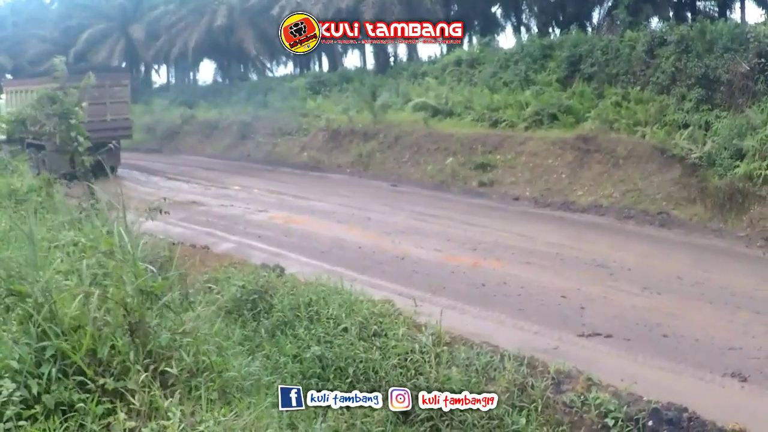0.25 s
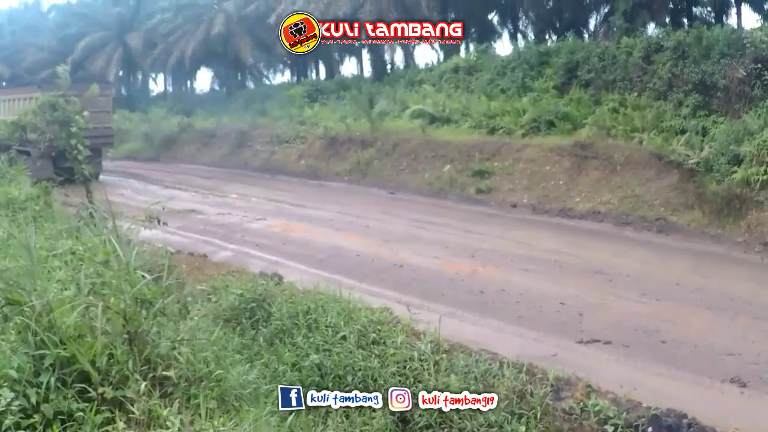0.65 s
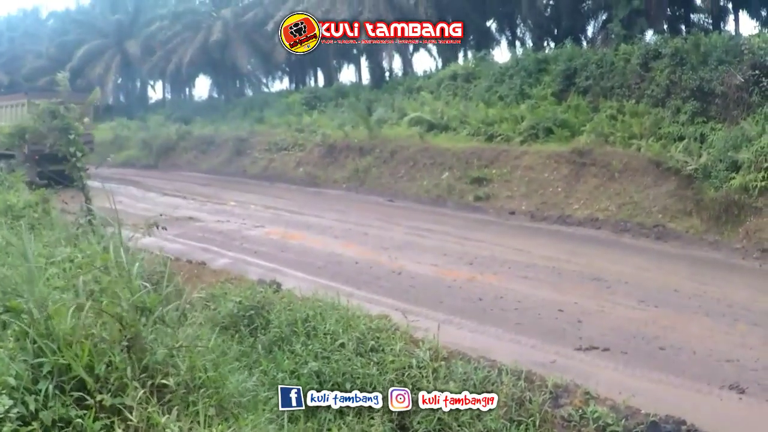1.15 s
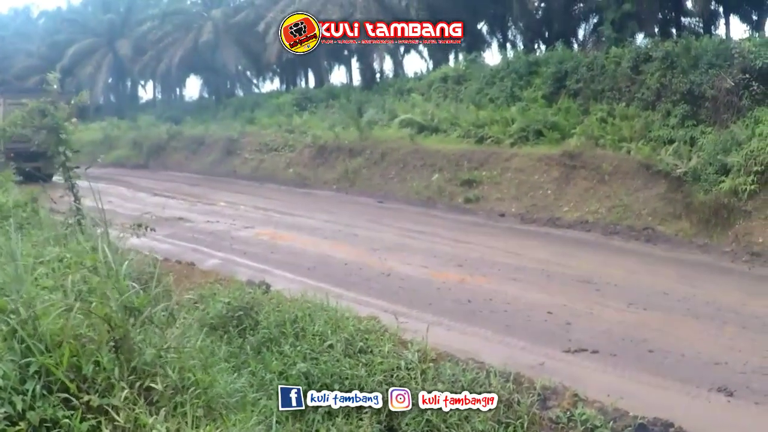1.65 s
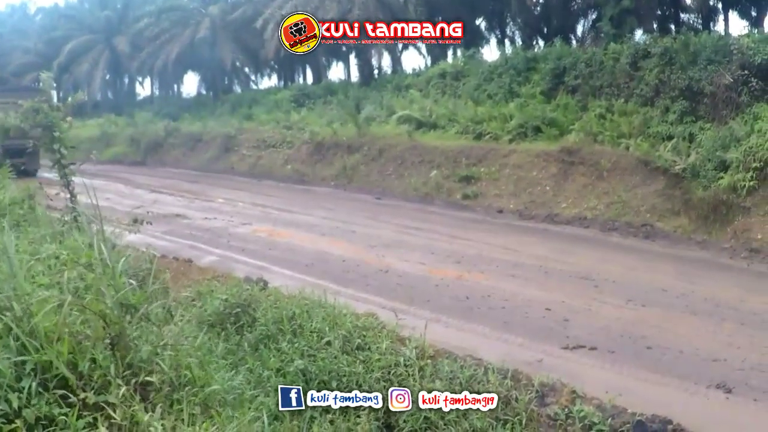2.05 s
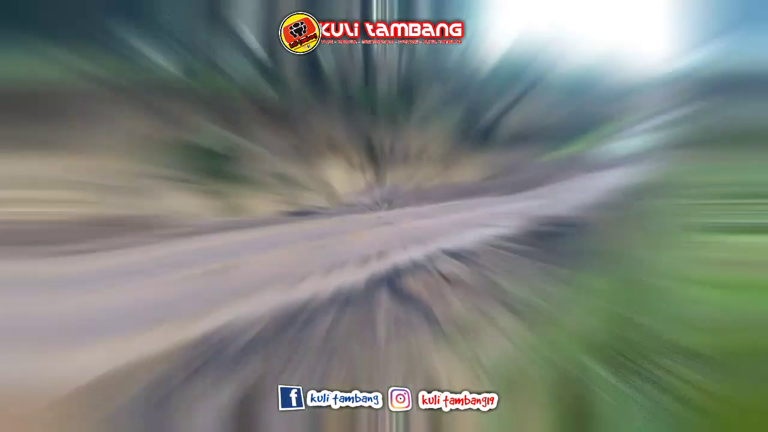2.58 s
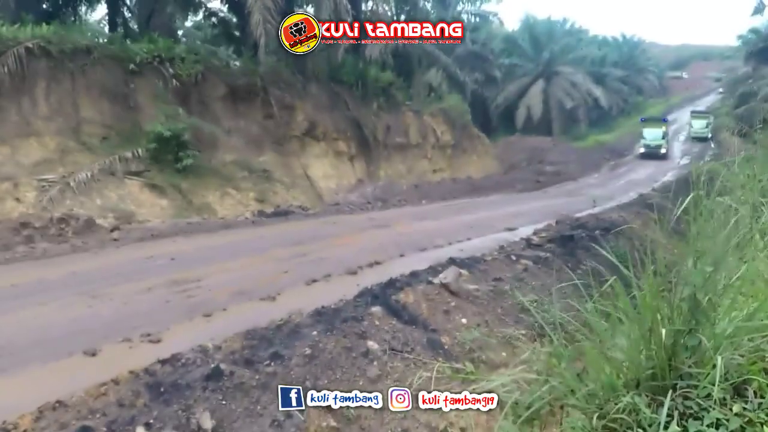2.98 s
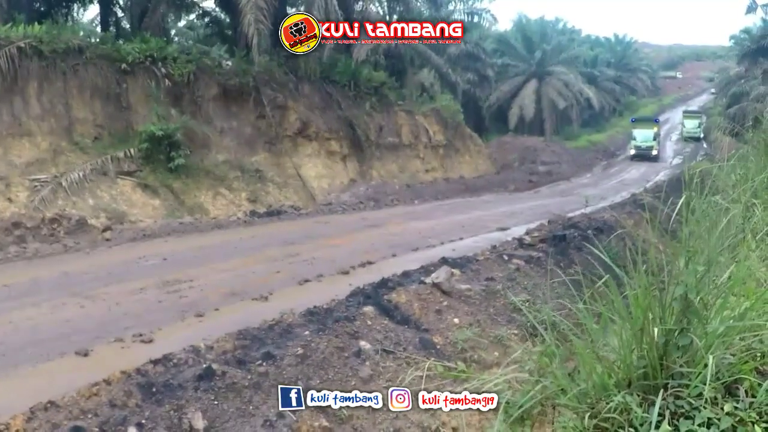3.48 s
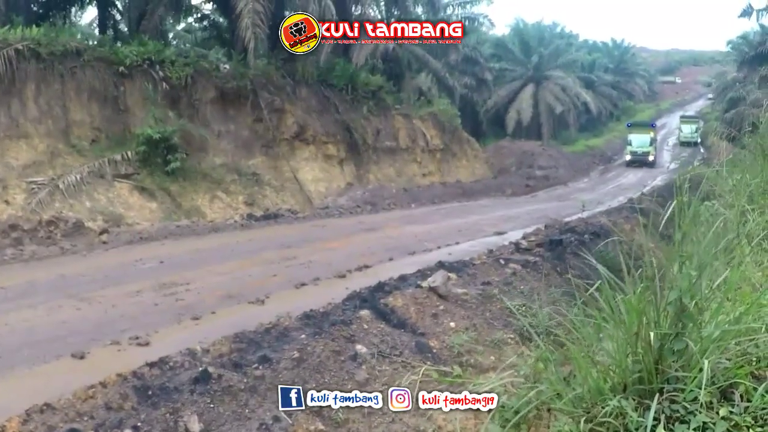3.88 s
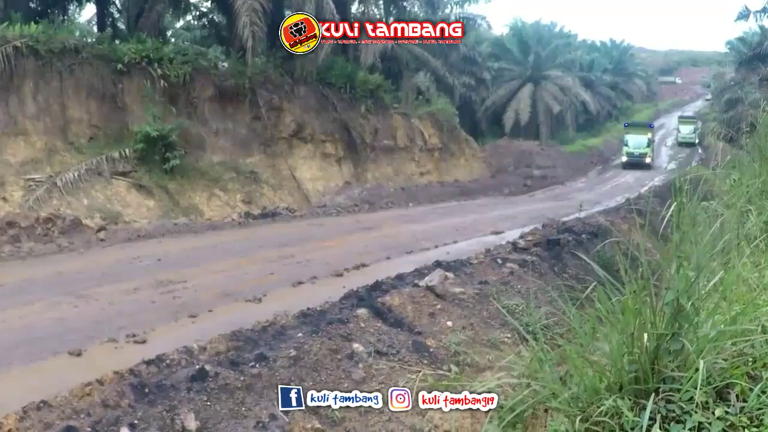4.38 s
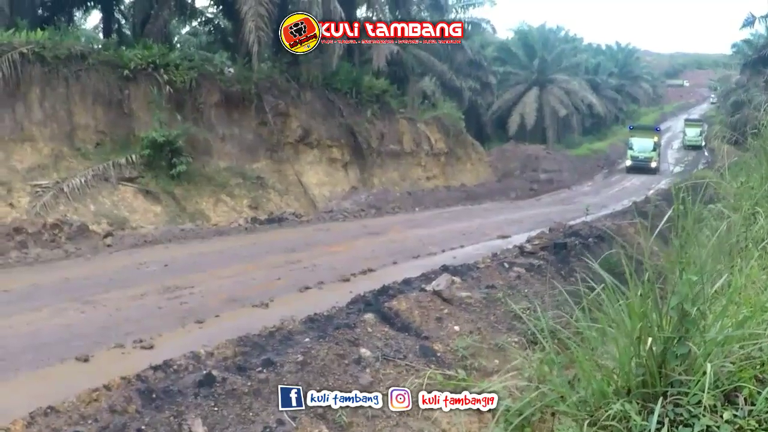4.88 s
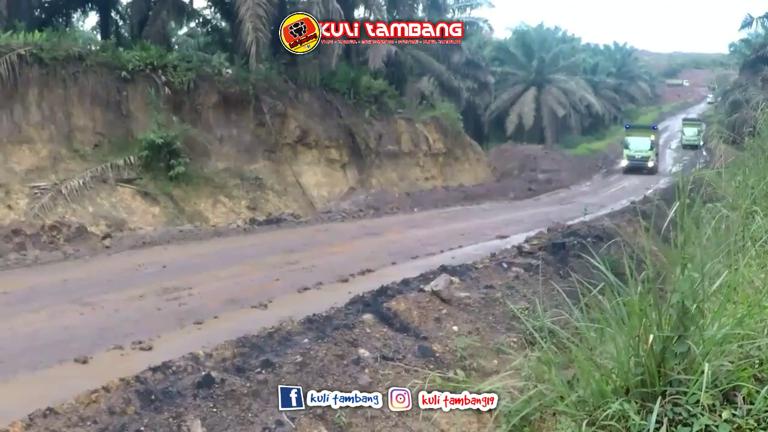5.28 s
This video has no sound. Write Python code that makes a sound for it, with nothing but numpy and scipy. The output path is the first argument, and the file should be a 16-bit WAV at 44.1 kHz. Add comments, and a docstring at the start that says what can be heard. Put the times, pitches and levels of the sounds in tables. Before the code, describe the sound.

A loaded diesel truck booms away along a wet muddy road, then the sound fades across to quieter trucks throbbing and revving up a distant hill.

```python
"""A booming exhaust note comes first: a loaded diesel dump truck climbs away near the microphone on a muddy
road. Between about 2 and 3 s the near scene fades over into a far one with two trucks up the hill, revving.
Exhaust notes, revs and hums are wavering sines. Roar, rumble, treble and the hiss of fans and wet tyres
are shaped noise that blends from near to far colour; narrower noise bands and dry ticks lie on top."""
import sys
import numpy as np
from scipy import signal
from scipy.io import wavfile
from scipy.ndimage import uniform_filter1d

SR = 44100
rng = np.random.default_rng(int(sys.argv[2]) if len(sys.argv) > 2 else 0)


def int16_out(signal):
    """Quantize to a 16-bit WAV file."""
    q = np.round(np.clip(np.atleast_2d(signal).T, -1, 1) * 32767)
    wavfile.write(sys.argv[1], SR, q.astype(np.int16))


N = 243864


def gain_of(db):
    """Decibels to amplitude."""
    return 10 ** (np.asarray(db) / 20)


def evened(x):
    """Scales to rms 1."""
    return x / np.sqrt(np.mean(x ** 2) + 1e-20)


def columns(rows, t):
    """Reads every column after the first at the times t, along straight lines between rows."""
    times, *rest = np.transpose(rows)
    return [np.interp(t, times, column) for column in rest]


def wander(rate):
    """Slow irregular drift of rms 1: sines of random phase from rate / 10 to rate [Hz], slower ones stronger."""
    t = np.arange(N) / SR
    drift = np.zeros(N)
    for hz in np.geomspace(rate / 10, rate, 16):
        drift += np.sin(2 * np.pi * (hz * t + rng.random())) / np.sqrt(hz)
    return evened(drift)


def tone(hz, db, waver_hz, flutter_db, rate):
    """A sine at the level db; its pitch and level waver irregularly."""
    turns = np.cumsum(hz + waver_hz * wander(rate)) / SR + rng.random()
    level = gain_of(db + flutter_db * wander(rate))
    return np.sqrt(2) * level * np.sin(2 * np.pi * turns)


# Fade from the near scene to the far one: (time [s], share of the far scene [0-1])
SCENE_FADE = [(0, 0), (2.2, 0.12), (2.6, 0.36), (3.05, 0.89), (5.53, 0.98)]


def far_share(t):
    """Share of the far scene at the times t, as the scenes blend."""
    return np.clip(columns(SCENE_FADE, t)[0], 0, 1)


def spectrum(rows, hz):
    """Amplitude of each bin, of rms 1: levels joined on a log frequency scale, -120 dB outside."""
    table_hz, db = np.transpose(rows)
    return evened(gain_of(np.interp(np.log(hz + 1), np.log(table_hz + 1), db, -120, -120)))


def noise(near, far, size, patchy_db):
    """Random short-time spectra, blending from the near colour to the far one, with drifting patches."""
    hop = size // 4
    frames, hz = N // hop + 5, np.fft.rfftfreq(size, 1 / SR)
    real, imag, patches = rng.standard_normal((frames, len(hz), 3)).T
    patches = uniform_filter1d(patches, size // 90, 0)  # nearly 500 Hz wide
    patches = evened(uniform_filter1d(patches, 16000 // size, 1))  # 0.1 s long or less
    share = far_share(np.arange(frames) * hop / SR)
    near_power = np.outer(spectrum(near, hz) ** 2, 1 - share)
    far_power = np.outer(spectrum(far, hz) ** 2, share)
    bins = (real + 1j * imag) * np.sqrt(near_power + far_power) * gain_of(patchy_db * patches)
    return evened(signal.istft(bins, nperseg=size, noverlap=3 * hop)[1][:N])


# Exhaust note of the nearest engine: (time [s], firing rate [Hz], level before throb and flutter [dB])
NEAR_EXHAUST = [(0, 73.5, -5.5), (.25, 75.6, -7), (.45, 74.45, -8), (.7, 76.6, -8.5), (.95, 75.65, -8),
                (1.15, 80.55, -9), (1.3, 77.6, -8.5), (1.45, 77.9, -13), (1.6, 79.84, -8.5), (1.8, 77, -9),
                (2.0, 79.5, -9), (2.2, 77.8, -10), (2.4, 78.1, -14.5), (2.72, 78.2, -19.5),
                (3.05, 79.1, -19.5), (3.6, 78, -18), (4.3, 79.1, -19.5), (4.65, 79, -19), (4.9, 78, -19),
                (5.3, 77.4, -19.5), (5.45, 78.2, -24), (5.53, 79.8, -21.5)]
# Dips of the throb heard in the far scene: (time [s])
THROB_DIPS = [2.8, 3.24, 3.47, 3.79, 4.16, 4.53, 4.7, 5.08, 5.23, 5.37, 5.6]


def exhaust():
    """The booming note; in the far scene it throbs like two close notes beating."""
    t = np.arange(N) / SR
    depth = .68 * far_share(t) ** 2
    beats = np.interp(t, THROB_DIPS, np.arange(len(THROB_DIPS)))  # one uneven beat from dip to dip
    throb = abs(1 - depth * np.exp(2j * np.pi * beats))
    return throb * tone(*columns(NEAR_EXHAUST, t), waver_hz=.45, flutter_db=0.85, rate=12)


# Roar of the truck close by: (frequency [Hz], relative level per Hz [dB])
NEAR_ROAR = [(45, -32.5), (62, -9.5), (95, -6.5), (140, -7.5), (212, -6), (284, -8.5), (317, -10.5),
             (393, -14), (457, -16), (620, -17.5), (823, -24.5), (1130, -25), (1250, -40), (1500, -67.5)]
# Roar of the trucks up the hill: (frequency [Hz], relative level per Hz [dB])
FAR_ROAR = [(45, -30), (62, -0.5), (95, -7), (125, -5), (264, -9), (311, -2.5), (351, -6), (417, -8),
            (490, -13), (645, -17), (800, -24), (1100, -33), (1200, -39), (1500, -66)]


def roar(level_db):
    """Engine roar: noise below 1500 Hz, puffed a little by each firing stroke."""
    firing = np.cumsum(columns(NEAR_EXHAUST, np.arange(N) / SR)[0]) / SR
    puffs = 1 + 0.063 * np.cos(2 * np.pi * firing)
    return puffs * gain_of(level_db) * noise(NEAR_ROAR, FAR_ROAR, size=4096, patchy_db=0.85)


# Low rumble, the same near and far: (frequency [Hz], relative level per Hz [dB])
RUMBLE_COLOUR = [(8, -28.5), (20, 1.5), (45, 3), (58, -7.5), (75, -33.5)]


def rumble(level_db):
    """Noise below 75 Hz that comes in lumps as its level wanders."""
    lumps_db = 1.4 * wander(18)
    return gain_of(level_db + lumps_db) * noise(RUMBLE_COLOUR, RUMBLE_COLOUR, size=8192, patchy_db=0.0)


# Hiss close by: (frequency [Hz], relative level per Hz [dB])
NEAR_HISS = [(1150, -31.5), (1300, -7.5), (1900, -6.5), (2300, 0.5), (2520, -5.5), (3060, 0.5),
             (3430, -9.5), (3700, 1), (4080, -5.5), (4880, -1.5), (5600, -7), (5950, -14), (6600, -16),
             (7200, -41.5)]
# Hiss from up the hill: (frequency [Hz], relative level per Hz [dB])
FAR_HISS = [(1150, -31), (1310, -5), (1430, -12.5), (2150, -10.5), (2400, -1), (2800, 2.5), (3100, -2),
            (3380, -13.5), (3750, -7.5), (5050, -8.5), (5500, -18), (6000, -23), (6600, -30), (7200, -53.5)]


def hiss(level_db):
    """Fans and wet tyres: noise from about 1.2 to 7 kHz."""
    return gain_of(level_db) * noise(NEAR_HISS, FAR_HISS, size=1024, patchy_db=0.68)


# Treble close by: (frequency [Hz], relative level per Hz [dB])
NEAR_TREBLE = [(5900, -28.5), (6500, 2), (7100, -2), (8030, 0), (8600, -1), (9150, -10.5), (10900, -12),
               (13500, -19), (15300, -28.5)]
# Treble from up the hill: (frequency [Hz], relative level per Hz [dB])
FAR_TREBLE = [(5700, -30), (6200, 2), (6900, -0.5), (8300, 3.5), (9470, -3.5), (14300, -11), (15300, -22.5)]


def treble(level_db):
    """Thin, patchy noise above about 6 kHz."""
    return gain_of(level_db) * noise(NEAR_TREBLE, FAR_TREBLE, size=512, patchy_db=1.8)


def whistle(hz, width_hz, db):
    """A flickering band: complex noise smoothed by two one-pole filters, then shifted up to hz."""
    t = np.arange(N) / SR
    pole = np.exp(-np.pi * width_hz / SR)
    fuzz = rng.standard_normal(N) + 1j * rng.standard_normal(N)
    for _ in range(2):
        fuzz = signal.lfilter([1 - pole], [1, -pole], fuzz)
    band = evened((fuzz * np.exp(2j * np.pi * hz * t)).real)
    return gain_of(db + 1.0 * wander(14)) * band  # flicker of 1 dB rms


# Narrow and wide bands in the near hiss: (centre frequency [Hz], width set by each one-pole filter [Hz])
WHISTLE_BANDS = [(1745, 36), (4780, 1100), (6255, 310), (10050, 500), (11500, 600), (13300, 600)]
# One curve a band, before flicker: (time [s], level [dB])
WHISTLE_CURVES = [
    [(0, -63), (.49, -55), (.7, -64), (1.06, -67), (1.23, -51), (1.4, -58), (2.05, -55.5), (2.4, -59),
     (2.6, -85)],
    [(0, -39), (.2, -39), (.5, -45), (.9, -46.5), (1.3, -49), (1.6, -61), (1.75, -90)],
    [(0, -40), (.16, -41), (.27, -55), (.42, -46), (.51, -50), (.6, -45), (.72, -42), (.95, -54.5),
     (1.16, -46), (1.35, -49), (2.03, -51.5), (2.08, -57), (2.5, -55.5), (2.7, -65), (2.85, -90)],
    [(0, -57), (.08, -59), (.35, -58), (.46, -68), (1.01, -68), (1.06, -60), (1.3, -61.5), (1.7, -75),
     (1.8, -68), (2.3, -71), (2.5, -81), (2.7, -90)],
    [(0, -69), (.21, -60), (.32, -67), (.46, -65), (.74, -69), (.9, -71), (1.1, -68), (1.25, -90)],
    [(0, -68), (.17, -66), (.26, -74), (.4, -68), (.5, -76), (.6, -95)],
]


def whistles():
    """Bands of noise that come and go in the near hiss."""
    t = np.arange(N) / SR
    return sum(whistle(*band, *columns(curve, t)) for band, curve in zip(WHISTLE_BANDS, WHISTLE_CURVES))


# Steadier tones of driveline and fans: (frequency at the start [Hz], drift [Hz per s])
HUM_TONES = [(106.7, -.12), (248.6, -.3), (365.2, .3), (373, 1.7)]
# One curve a hum, before flutter: (time [s], level [dB])
HUM_CURVES = [
    [(0, -43), (.25, -31), (.5, -33.5), (1.15, -28), (1.5, -29.5), (2.7, -36.5), (3.0, -27), (3.25, -37),
     (3.85, -28.5), (4.25, -37), (4.5, -31), (5.53, -34.5)],
    [(0, -38), (.15, -31.5), (.75, -33.5), (.9, -29), (1.35, -28), (1.5, -30.5), (1.95, -27.5), (2.6, -36),
     (2.85, -45.5), (3.0, -90)],
    [(0, -41), (.6, -35), (.85, -55), (1.3, -35.5), (1.95, -48.5), (2.2, -38.5), (2.5, -44), (2.8, -40),
     (2.95, -92)],
    [(2.75, -94), (3.05, -35.5), (3.4, -30.5), (3.55, -34.5), (3.65, -45), (3.95, -38.5), (4.1, -35),
     (4.45, -34), (4.7, -30), (5.0, -34.5), (5.15, -28.5), (5.53, -28.5)],
]


def hums():
    """Driveline and fans: sines that drift slowly in pitch."""
    t = np.arange(N) / SR
    return sum(tone(hz + drift_hz * t, *columns(curve, t), waver_hz=.3, flutter_db=0.57, rate=10)
               for (hz, drift_hz), curve in zip(HUM_TONES, HUM_CURVES))


def rev(start, length, from_hz, to_hz, peak_db):
    """A far swell; its pitch glides almost evenly, a little faster at first, and it peaks just before its middle."""
    progress = np.clip((np.arange(N) / SR - start) / length, 0, 1)
    arch = np.sin(np.pi * progress ** 0.86)
    hz = from_hz + (to_hz - from_hz) * progress ** 0.83
    db = peak_db - 14 * (1 - arch)
    ends = np.minimum(4 * arch, 1)  # fades to silence at both ends
    return ends * tone(hz, db, waver_hz=0.81, flutter_db=3.6, rate=13)


# Engines far up the hill: (start [s], length [s], from [Hz], to [Hz], peak level before flutter [dB])
FAR_REVS = [(2.449, .45, 55, 55.06, -28), (3.05, 0.32, 59.5, 66.5, -19), (3.306, 0.49, 67.7, 73.27, -29),
            (3.199, 0.96, 82.8, 90, -31), (3.45, 0.79, 53, 52, -23.5), (3.6, 0.41, 45.4, 61.7, -20.5),
            (3.896, 0.63, 58, 68.9, -23), (4.1, 0.64, 86, 84.2, -31), (4.404, 0.76, 57.97, 64.4, -28),
            (4.68, 0.49, 70.37, 73.5, -21.5), (4.62, 0.92, 86.2, 83.9, -26.5)]


def revs():
    """The far engines revving: overlapping swells of low tone."""
    return sum(rev(*row) for row in FAR_REVS)


# Faint dry ticks at about 3 s, as the far scene takes over: (time [s], level [dB])
DRY_TICKS = [(2.9987, -35), (3.002, -44), (3.0085, -55)]


def ticks():
    """Short high rings: 11.3 kHz under a bell-shaped swell well below a millisecond long."""
    out, t = np.zeros(N), np.arange(90) / SR
    ring = np.sin(2 * np.pi * 11300 * t) * np.exp(-((t - .001) / 0.00016) ** 2)
    for time, db in DRY_TICKS:
        first = round((time - .001) * SR)  # the swell is centred 1 ms into the ring
        out[first:][:len(t)] += gain_of(db) * ring
    return out


# Noise at the microphone: (time [s], roar level [dB], hiss level [dB], treble level [dB],
# rumble level before its lumps [dB])
NOISE_LEVELS = [(0, -25.5, -36, -47, -17), (.1, -23.5, -37.5, -49, -24), (.25, -25, -38.5, -53, -22),
                (.38, -24.5, -38.5, -46.5, -27), (.52, -23.5, -38.5, -52.5, -24),
                (.65, -25.5, -39, -50.5, -25), (.9, -23.5, -38.5, -54.5, -17),
                (1.25, -24.5, -40.5, -53.5, -33), (1.55, -25, -40, -55, -29), (1.99, -23.5, -39, -54, -21),
                (2.27, -27, -40.3, -52.5, -29), (2.36, -27.7, -42.5, -57, -33), (2.56, -30, -45, -60, -33),
                (2.9, -29.5, -46, -63.5, -28), (3.16, -25, -42, -60, -27),
                (3.56, -26.5, -41.5, -61.5, -30.5), (3.8, -26.5, -41.5, -61, -32),
                (4.7, -24.5, -41.3, -61.5, -30), (5.53, -25.5, -40.5, -61.5, -27.5)]


def scene():
    """Sums tones, noise layers, whistles and ticks at the microphone, in one channel."""
    roar_db, hiss_db, treble_db, rumble_db = columns(NOISE_LEVELS, np.arange(N) / SR)
    notes = exhaust() + hums() + revs()
    noises = roar(roar_db) + rumble(rumble_db) + hiss(hiss_db) + treble(treble_db)
    return (notes + noises + whistles() + ticks())[None]


def record(dry):
    """The band limit of the recorder: a symmetric low-pass filter at 15.3 kHz."""
    lowpass = signal.firwin(511, 15300, window=("kaiser", 9), fs=SR)
    return signal.oaconvolve(dry, lowpass[None], "same", axes=1)


dry = scene()
out = record(dry)
int16_out(out)
```